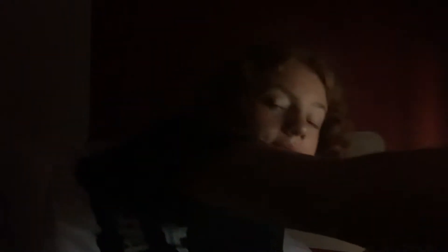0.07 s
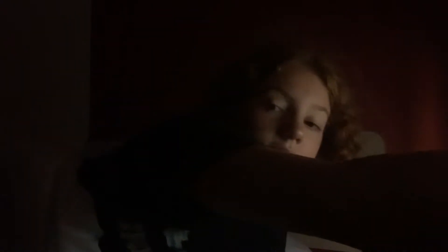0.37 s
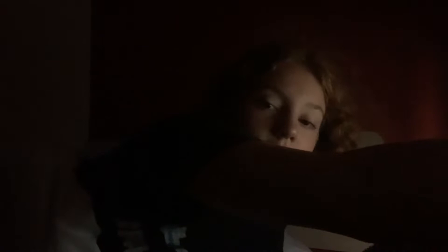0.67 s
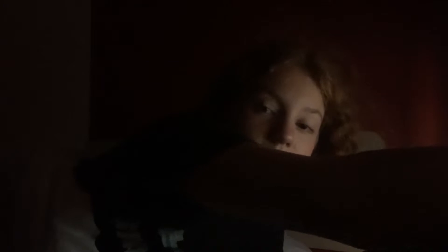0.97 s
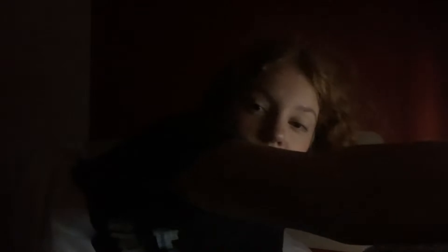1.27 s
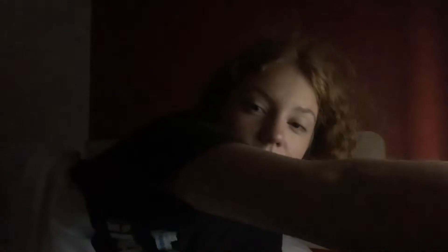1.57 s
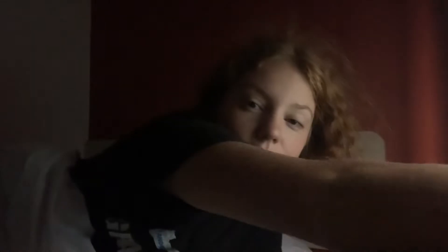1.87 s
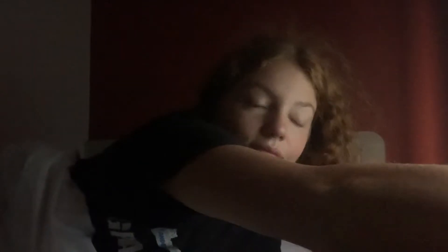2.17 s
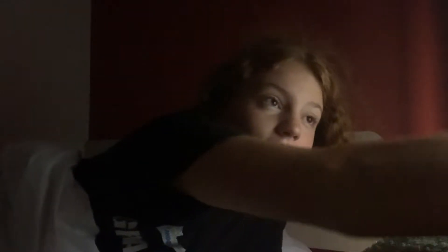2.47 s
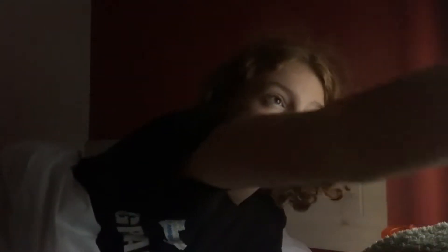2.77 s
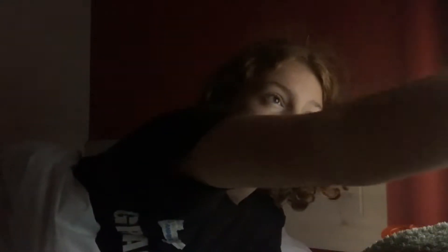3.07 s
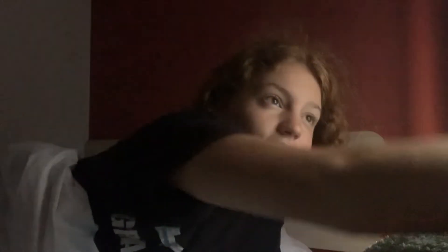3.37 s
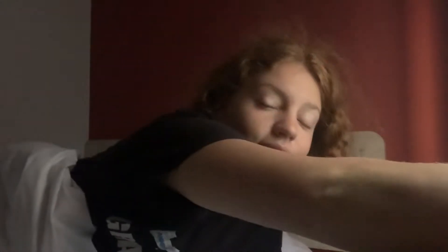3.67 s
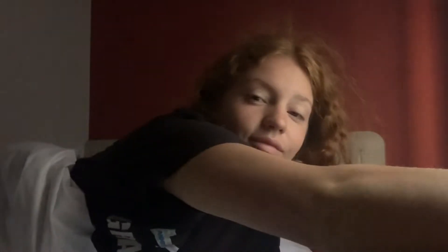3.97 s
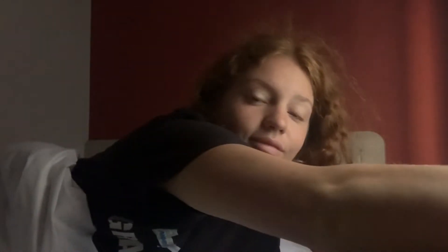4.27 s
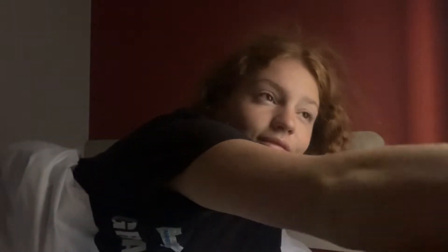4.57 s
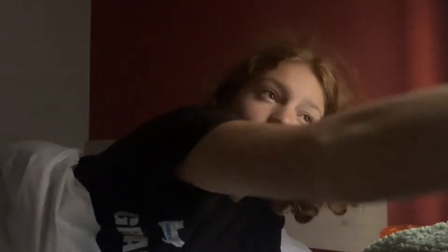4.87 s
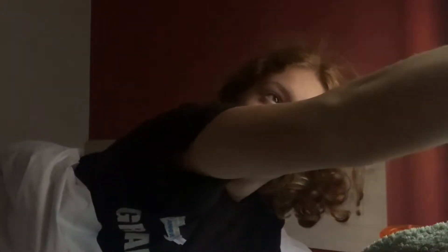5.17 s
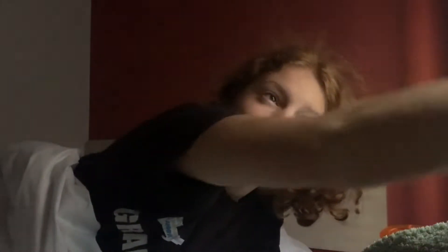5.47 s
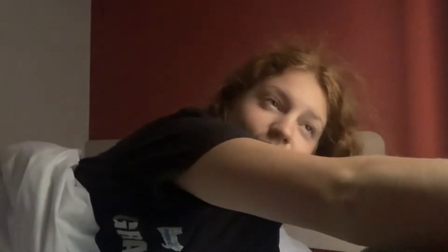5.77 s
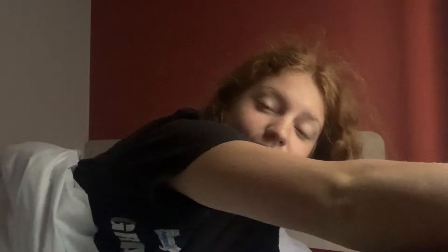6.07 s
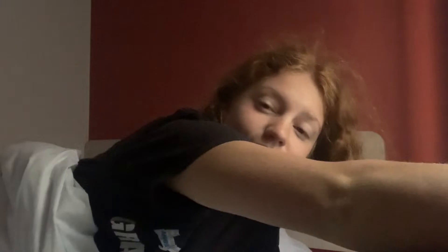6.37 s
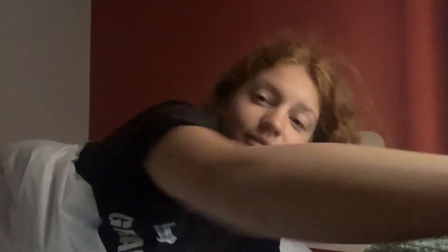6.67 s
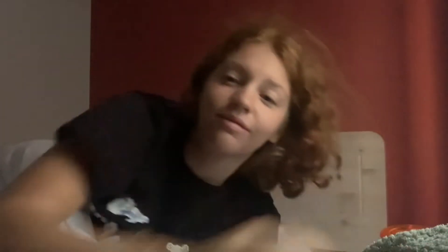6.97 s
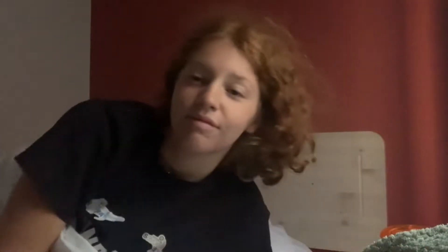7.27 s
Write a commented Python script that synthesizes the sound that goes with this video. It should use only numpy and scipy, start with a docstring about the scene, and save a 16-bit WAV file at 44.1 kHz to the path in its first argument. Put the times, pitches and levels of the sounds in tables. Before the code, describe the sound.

A roller shutter is hauled up in three pulls, its strap hissing and slats clattering, with bedding rustling in a quiet room.

```python
"""A roller shutter is hauled up by its strap, heard from a bed in a small room.
Over low room noise, bedding stirs, slats knock as they take up slack and the winder ticks.
Three pulls follow, at 1.2, 3.1 and 5.4 s: the strap hisses and clatters through its guide,
slats scrape up their rails and the roller rumbles in its box. Bedding rustles between pulls.
At 7.2 s an arm drops on the mattress."""
import sys
import numpy as np
from scipy import signal
from scipy.fft import rfft, irfft
from scipy.io import wavfile
from scipy.ndimage import uniform_filter1d

SR = 44100
rng = np.random.default_rng(int(sys.argv[2]) if len(sys.argv) > 2 else 0)


def waveform_to_disk(signal):
    """Save audio, clipped to [-1, 1], as 16-bit WAV at the path in sys.argv[1]."""
    frames = np.transpose(np.atleast_2d(signal))
    scaled = np.clip(frames, -1, 1) * 32767
    samples = np.round(scaled).astype(np.int16)
    wavfile.write(sys.argv[1], SR, samples)


N = 331632
TIME_S = np.arange(N) / SR
SHUTTER_LAG_MS = .34  # left channel behind right


def undb(db):
    """Decibels to gain."""
    return np.exp(np.asarray(db) * (np.log(10) / 20))


def unit(x):
    """Scale to rms 1."""
    return x / np.sqrt(np.mean(x ** 2))


def along(points, n):
    """Read (Hz, value) points at the bins of an n-point spectrum."""
    hz, value = np.transpose(points)
    return np.interp(np.log(np.arange(n // 2 + 1) * SR / n + 1), np.log(hz), value)


def colour(x, points):
    """Minimum-phase filter through (Hz, dB) points."""
    n = x.shape[-1]
    cepstrum = irfft(np.log(undb(along(points, n))), n)
    cepstrum[1:n // 2] *= 2
    cepstrum[n // 2 + 1:] = 0
    return irfft(rfft(x) * np.exp(rfft(cepstrum)), n)


def resonate(x, hz, width_hz):
    """One resonance, gain 1 at centre."""
    return signal.lfilter(*signal.iirpeak(hz, hz / width_hz, SR), x)


def walk(rate_hz):
    """Slewed random steps, spread near 1."""
    hold = max(2, int(SR / rate_hz))
    steps = np.repeat(rng.standard_normal(N // hold + 1), hold)
    return 1.2 * uniform_filter1d(steps, hold)[:N]


def grains(spread_db, n=N, hold=4, cap_db=14):
    """Dense tiny slips of uneven size, hold samples each; rms 1."""
    size_db = np.minimum(spread_db * rng.exponential(size=n // hold + 1), cap_db)
    return unit(rng.standard_normal(n) * np.repeat(undb(size_db), hold)[:n])


def ramp(start_s, rise_s, hold_s, fall_s):
    """Speed of one movement: up to 1, steady, back to rest."""
    return np.interp(TIME_S, start_s + np.cumsum([0, rise_s, hold_s, fall_s]), [0, 1, 1, 0])


def movements(rows):
    """Gain of light movements: quick swell, long fade."""
    return sum(undb(db) * ramp(s, .14 * span_s, .01 * span_s, .85 * span_s) for s, span_s, db in rows)


def blows(rows, spectrum, spread_db, rise_s, ring_db, q):
    """Each blow is a dying chatter of contacts ringing at its own pitch."""
    t = np.arange(SR // 5) / SR
    force = np.zeros(N + len(t))
    for s, db, chatter_s, hz in rows:
        envelope = (1 - np.exp(-t / rise_s)) * np.exp(-t / max(chatter_s, 1e-4))
        burst = unit(colour(grains(spread_db, len(t)) * envelope, spectrum))
        burst = burst + undb(ring_db) * unit(resonate(burst, hz, hz / q))
        start = int(s * SR)
        force[start:start + len(t)] += undb(db) * unit(burst) / np.sqrt(6)
    return force[:N]


# stereo width: (frequency [Hz], side minus mid [dB])
DIFFUSE_WIDTH = [(50, -6), (130, -9), (270, -7.5), (550, 0), (1100, 1), (5500, -0.5), (8000, 6),
                 (10000, 3.5), (14000, -63)]


def diffuse(n):
    """Noise from all sides, alike left and right in the bass."""
    mid, side = rng.standard_normal((2, n))
    side = colour(side, DIFFUSE_WIDTH)
    return np.array([mid + side, mid - side])


# reverberation: (frequency [Hz], t60 [s])
ROOM_DECAY = [(80, 0.96), (300, 0.3), (1000, 0.29), (3000, 0.37), (7000, 0.28), (13000, 0.32),
              (14800, 0.098)]
# neutral spectrum: (frequency [Hz], level [dB])
FLAT = [(20, 0), (20000, 0)]


def response(spectrum, direct_db, lag_ms, modes=(), early_db=-2, early_s=0.026):
    """Unit-energy impulse response of object and room; positive lag is to the right."""
    n = SR * 3 // 5
    t = np.arange(n) / SR
    noise, tail = rfft(diffuse(n)), 0
    for centre_hz, t60_s in ROOM_DECAY:
        band = along([(hz, float(hz == centre_hz)) for hz, _ in ROOM_DECAY], n)
        tail = tail + irfft(noise * band, n) * undb(-60 * t / t60_s)
    near_walls = 1 + undb(early_db) * np.exp(-(t / early_s) ** 2)
    paths = unit(tail * near_walls) / np.sqrt(n)
    lag = int(round(lag_ms * SR / 1000))
    paths[0, max(lag, 0)] += undb(direct_db)
    paths[1, max(-lag, 0)] += undb(direct_db)
    body = colour(paths, spectrum)
    body = body + sum(undb(db) * resonate(body, hz, width_hz) for hz, width_hz, db in modes)
    return body / np.sqrt(np.sum(body.mean(axis=0) ** 2))


def heard(force, impulse):
    """Play a force through object and room."""
    return signal.oaconvolve(force[None], impulse, axes=1)[:, :N]


# strap pulls: (time [s], rise [s], hold [s], fall [s], peak rib rate [Hz],
# hiss [dB], scrape [dB], rumble [dB])
PULLS = [(1.234, 0.11, 0.5, 0.0758, 56, -56, -60, -49), (3.088, 0.21, 0.18, 0.28, 69, -43.5, -49.5, -43),
         (5.375, 0.23, 0.15, 0.14, 104, -38.5, -44, -41.5)]


def hauling(layer, power):
    """Gain of a layer as a power of strap speed."""
    column = ("hiss", "scrape", "rumble").index(layer)
    return sum(undb(levels_db[column]) * ramp(s, rise_s, hold_s, fall_s) ** power
               for s, rise_s, hold_s, fall_s, _, *levels_db in PULLS)


# slats binding in the rails: (time [s], length [s], scrape [dB], rumble [dB])
BINDS = [(1.415, 0.068, -44.5, -46), (1.773, 0.061, -47.5, -40.5), (3.197, .1, -50.5, -47),
         (3.286, 0.071, -49, -43), (3.414, 0.098, -47.5, -42), (3.54, 0.23, -62, -78),
         (5.542, 0.08, -41, -39), (5.637, 0.089, -42.5, -40.5)]


def binding(layer):
    """Gain of a layer, swelling and easing where the slats bind."""
    column = ("scrape", "rumble").index(layer)
    return sum(undb(levels_db[column]) * ramp(s, span_s / 2, 0, span_s / 2)
               for s, span_s, *levels_db in BINDS)


# room noise: (frequency [Hz], level [dB])
AIR_SPECTRUM = [(12, -47), (20, -1), (54, -4.5), (245, -8.5), (333, -17.5), (452, -26.5), (788, -32),
                (1040, -26), (1580, -35.5), (2330, -38.5), (2610, -40), (5090, -42), (7520, -48),
                (13500, -41), (14400, -69), (15200, -82)]
# hum tones: (frequency [Hz], level [dB])
HUM_TONES = [(67, -63), (313, -75.5)]


def air(noise_db=-62, split_hz=300, swell_db=3.2, waver_db=4):
    """Room noise: steady treble, uneven bass, faint wavering hum."""
    noise = colour(diffuse(N), AIR_SPECTRUM)
    noise = noise / np.std(noise.mean(axis=0)) * undb(noise_db)
    bass = signal.sosfiltfilt(signal.butter(2, split_hz, fs=SR, output="sos"), noise)
    hum = sum(undb(db + waver_db * walk(21)) * np.sin(2 * np.pi * hz * TIME_S + 3.45 * walk(11))
              for hz, db in HUM_TONES)
    return noise - bass + bass * undb(swell_db * walk(24)) + np.sqrt(2) * hum


# cloth friction: (frequency [Hz], level [dB])
CLOTH_SPECTRUM = [(240, -12), (400, 1.5), (518, -4.5), (1190, -5.5), (2700, -10), (5110, -11), (7700, -17),
                  (11100, -12), (13900, -28), (15000, -106)]
# bedding and sleeve shifts: (time [s], length [s], level [dB], pitch [Hz])
RUSTLES = [(0, 0.32, -61, 630), (2.256, 0.29, -64.5, 4480), (3.759, 0.018, -55, 534),
           (3.844, 0.078, -61.5, 530), (4.32, 0.27, -78.5, 2550), (4.872, 0.064, -63.5, 3080),
           (5.906, 0.16, -62, 1984), (6.094, 0.17, -66.5, 2210), (6.972, 0.14, -67.5, 4700),
           (7.047, 0.3, -64, 1320), (7.198, 0.47, -64.5, 2640)]


def sheets(uneven_db=3.5, q=1.76):
    """Cloth rubs on cloth, each brush at its own pitch."""
    fibres = unit(colour(grains(9.5, hold=8), CLOTH_SPECTRUM))
    rubs = sum(movements([(s, span_s, db)]) * unit(fibres + unit(resonate(fibres, hz, hz / q)))
               for s, span_s, db, hz in RUSTLES)
    return heard(rubs * undb(uneven_db * walk(30)), response(FLAT, -0.43, -.04))


# roller box: (frequency [Hz], level [dB])
BOX_SPECTRUM = [(40, -18.5), (65, -5), (100, 1), (150, -1), (215, -3.5), (265, -2), (315, -1), (385, -5.5),
                (450, -13.5), (600, -20.5), (800, -48.5), (1300, -79.5)]
# shutter resonances: (frequency [Hz], width [Hz], gain [dB])
SHUTTER_MODES = [(223, 12, 0.5), (319.2, 10, -4), (383.4, 11, 4), (670, 180, -2.5), (910, 12, -16),
                 (1110, 70, 7), (1400, 58, 25.5), (1770, 72, 20.5), (1960, 66, 16.5), (2054, 17, 22.5),
                 (2820, 370, 5.5), (5600, 92, -18), (6300, 430, -6.5), (11500, 170, 7)]
# hanging slats rocking the roller: (time [s], length [s], level [dB])
SWAYS = [(0, 0.32, -50.5), (.83, 0.073, -48), (1.05, 0.35, -46), (3.62, 0.49, -50)]


def roller(gain_db=-1, lumpy_db=0.6, shift_hz=7):
    """The roller rumbles in its box; resonances shift as it turns."""
    drive = hauling("rumble", 0.85) + undb(-5) * binding("rumble") + movements(SWAYS)
    rumble = drive * grains(3.4) * undb(gain_db + lumpy_db * walk(25.15))
    blend_rad = 1.2 * walk(shift_hz)
    return sum(heard(rumble * share, response(BOX_SPECTRUM, -4.5, SHUTTER_LAG_MS, SHUTTER_MODES))
               for share in (np.cos(blend_rad), np.sin(blend_rad)))


# arm thud: (frequency [Hz], level [dB])
THUD_SPECTRUM = [(45, -9), (80, -6), (125, -1), (200, -10), (300, -7), (450, -32.5), (800, -48)]
# mattress modes: (frequency [Hz], level [dB], t60 [s])
BED_MODES = [(33.2, -13, 0.38), (64.7, -2.5, 0.99), (130.7, 2.5, 0.23), (200, -13, 0.17)]
# arm landings: (time [s], cloth [dB], thud [dB], mattress [dB], swell [s])
ARM_BUMPS = [(0.045, -65.5, -45, -44, 0.32), (6.522, -47, -44.5, -43.5, 0.013),
             (7.192, -40.5, -26.5, -29.5, 0.015)]


def arm_on_bed(settle_s=0.013, damp_s=.15):
    """An arm swishes on cloth, thuds and rings the mattress until its weight damps it."""
    t = np.arange(SR // 4) / SR
    envelope = np.exp(-(t / damp_s) ** 6) * (1 - np.exp(-t / .002))
    mattress = envelope * sum(undb(db - 60 * t / t60_s) * np.sin(2 * np.pi * hz * t)
                              for hz, db, t60_s in BED_MODES)
    cloth, thud, ring = 0, 0, np.zeros(N + len(t))
    for s, cloth_db, thud_db, ring_db, swell_s in ARM_BUMPS:
        after_s, before_s = np.maximum(TIME_S - s, 0), np.maximum(s - TIME_S, 0)
        press = np.exp(-np.minimum(before_s / swell_s + (after_s / settle_s) ** 2, 20))
        cloth = cloth + undb(cloth_db) * press
        thud = thud + undb(thud_db) * press ** 2
        ring[int(s * SR):int(s * SR) + len(t)] += undb(ring_db) * mattress
    swish = heard(cloth * grains(3.3, hold=8), response(CLOTH_SPECTRUM, -4.2, -.04))
    return swish + heard(thud * grains(2.1), response(THUD_SPECTRUM, 1.4, 0)) + ring[:N]


# light slat contact: (frequency [Hz], level [dB])
CLICK_SPECTRUM = [(350, -76), (600, -16.5), (896, 1), (1480, -5), (1700, 0), (2210, -11.5), (2630, -2.5),
                  (2870, -9), (3790, -4), (12000, -16.5), (15600, -92), (22000, -120)]
# settling slats: (time [s], level [dB], chatter [s], pitch [Hz])
CLICKS = [(.283, -64, 0.0005, 4600), (3.805, -59.5, 0.0034, 3120), (4.345, -74.5, 0.0026, 2900),
          (5.096, -61.5, 0.012, 2690), (5.109, -58.5, 0.0035, 2770), (5.173, -64.5, 0.011, 1540),
          (5.254, -56, 0.012, 2580), (2.523, -67.5, 0.0012, 4000), (6.308, -75, .001, 3040),
          (6.062, -70.5, 0.0087, 2100), (6.131, -61, 0.006, 1280), (6.713, -56.5, 0.002, 4850),
          (6.827, -61.5, 0.069, 1100), (7.081, -62.5, 0.0013, 2480)]


def slat_clicks():
    """Single slats click as they settle."""
    force = blows(CLICKS, CLICK_SPECTRUM, spread_db=7.5, rise_s=0.00019, ring_db=0, q=3.5)
    return heard(force, response(FLAT, 0.076, SHUTTER_LAG_MS))


# slat on slat: (frequency [Hz], level [dB])
CLACK_SPECTRUM = [(260, -53), (450, 5.5), (561, -2.5), (812, 0.5), (894, 2.5), (1240, -2), (1410, 6),
                  (1640, -2.5), (2010, 1), (3210, -9), (5870, -14), (7420, -20), (12000, -20.5),
                  (15600, -101), (22000, -120)]
# slat collisions: (time [s], clack [dB], box boom [dB], chatter [s], pitch [Hz])
KNOCKS = [(.285, -72.5, -53.5, 0.0056, 1110), (0.561, -54.5, -54, 0.0028, 1000),
          (0.865, -49, -50, 0.0084, 690), (.922, -54, -45, 0.0037, 1510), (1.042, -45, -43, 0.0059, 1800),
          (1.951, -47, -44, 0.006, 1020), (2.000, -46.5, -38.5, 0.0055, 800),
          (2.015, -51, -45.5, 0.005, 1240), (2.525, -69, -62, 0.011, 1420), (2.88, -53, -55, 0.0021, 1200),
          (2.994, -51.5, -46.5, 0.0023, 1350), (3.011, -47.5, -42, 0.011, 1440),
          (3.692, -54.5, -49.5, 0.0066, 1270), (3.762, -62.5, -56.5, 0.0017, 2350),
          (3.959, -55.5, -49.5, 0.0017, 1290), (3.971, -55, -47.5, 0.012, 1550),
          (4.029, -76, -53, 0.0036, 700), (4.53, -66, -62, 0.0041, 694), (5.289, -53.5, -45, 0.002, 960),
          (5.301, -47, -43.5, 0.0094, 1810), (5.346, -69, -47, 0.0044, 700),
          (5.914, -55.5, -46.5, 0.011, 1780), (6.403, -78, -56, 0.0044, 710),
          (6.508, -56.5, -50.5, 0.0085, 1420)]


def slat_knocks(rub_in_s=.014, rub_out_s=.055, rub_db=-9.5, bind_db=-0.5):
    """Slats knock together, rubbing around each landing and where they bind."""
    rows = [(s, db, chatter_s, hz) for s, db, _, chatter_s, hz in KNOCKS]
    knocks = blows(rows, CLACK_SPECTRUM, spread_db=6.5, rise_s=.001, ring_db=-8, q=4.1)
    landing = sum(undb(db + rub_db) * ramp(s - rub_in_s, rub_in_s, 0, rub_out_s) for s, db, *_ in KNOCKS)
    friction = unit(colour(grains(5.8, hold=24), CLACK_SPECTRUM))
    rubs = (landing + undb(bind_db) * binding("scrape")) * friction
    return heard(knocks + rubs, response(FLAT, -3.1, SHUTTER_LAG_MS))


# hollow box resonances: (frequency [Hz], width [Hz], gain [dB])
BOX_MODES = [(164.3, 3.6, 4.5), (209.3, 7.2, 7), (318.7, 7.9, 0.5), (391, 51, -7)]


def box_booms(gain_db=-2.5, centre_hz=300, stray_octaves=.4, stretch=3.44):
    """The hollow box booms after each knock, at a slightly different pitch."""
    pitches_hz = centre_hz * 2 ** rng.uniform(-stray_octaves, stray_octaves, len(KNOCKS))
    rows = [(s, db + gain_db, stretch * chatter_s, hz)
            for (s, _, db, chatter_s, _), hz in zip(KNOCKS, pitches_hz)]
    force = blows(rows, BOX_SPECTRUM, spread_db=5, rise_s=0.002, ring_db=-9, q=3.9)
    return heard(force, response(FLAT, -1.5, SHUTTER_LAG_MS, BOX_MODES))


# winder tick: (frequency [Hz], level [dB])
TICK_SPECTRUM = [(1290, -14), (2200, -25.5), (2620, -3), (2890, -11), (4170, -3), (4920, 2), (5570, 9.5),
                 (7520, 2.5), (8440, 2), (9560, 4), (12300, 5), (15000, 1), (16000, -29)]
# strap and winder ticks: (time [s], level [dB], chatter [s], pitch [Hz])
TICKS = [(.539, -56, 0.033, 10600), (.550, -66, 0.00065, 9000), (.562, -57, 0.0012, 9800),
         (.873, -53.5, 0.0024, 13800), (.924, -59, 0.0067, 8500), (1.027, -66, 0.0046, 11100),
         (1.045, -53, 0.0062, 11800), (1.276, -59.5, 0.01, 11500), (1.361, -54, 0.0011, 6300),
         (1.441, -44.5, 0.04, 11200), (1.608, -60, 0.011, 9900), (1.678, -67, 0.005, 11500),
         (1.722, -64, 0.0047, 9000), (1.76, -66, 0.0051, 12000), (1.787, -54, 0.0087, 10960),
         (1.828, -39.5, 0.0067, 13100), (1.838, -47, 0.028, 5800), (2.284, -59, 0.00012, 4340),
         (2.334, -59, 0.001, 4470), (2.5225, -46.5, 0.00043, 9640), (2.526, -54.5, 0.0012, 6800),
         (2.858, -49, 0.0033, 9900), (2.866, -52.5, 0.025, 5650), (2.869, -45.5, 0.0071, 10500),
         (3.444, -46.5, 0.007, 11100), (3.879, -65, 0.001, 7800), (4.438, -67.5, 0.0024, 11200),
         (4.523, -79, .001, 10000), (4.583, -74, .003, 12000), (4.672, -72, 0.00091, 10800),
         (4.682, -75, 0.0014, 12000), (4.750, -69.5, 0.00079, 11500), (4.922, -65, 0.0019, 10200),
         (4.936, -63.5, 0.0032, 12000), (5.2415, -49, 0.00048, 11000), (5.243, -39.5, 0.0012, 11200),
         (5.246, -45, 0.046, 5900), (6.164, -79, .0006, 12400), (6.308, -71, 0.0024, 12800),
         (6.7135, -53.5, 0.00093, 11500), (6.720, -55, 0.0031, 11000), (6.727, -52.5, 0.0024, 7400),
         (6.824, -56, 0.004, 11500), (6.837, -56, 0.011, 11500)]


def winder():
    """Strap and winder snap tight with short bright ticks."""
    force = blows(TICKS, TICK_SPECTRUM, spread_db=1.5, rise_s=0.0009, ring_db=-9, q=5)
    return heard(force, response(FLAT, 0.14, -.09))


# strap friction: (frequency [Hz], level [dB])
STRAP_SPECTRUM = [(1650, -31), (2800, -15), (3470, 1), (3840, -1.5), (4690, 7.5), (5150, 4.5), (6330, 8.5),
                  (7410, 1.5), (8310, 5.5), (9260, 4.5), (11100, 7), (11600, 3), (13800, 2), (15200, -56),
                  (15500, -102)]
# slack strap sliding through the hand: (time [s], length [s], level [dB])
SLIDES = [(.82, 0.15, -60.5), (.87, 0.065, -49.5), (2.39, 0.22, -67.5), (2.92, 0.14, -57), (3.65, 0.1, -55),
          (4.45, 0.2, -70.5), (5.228, 0.027, -59), (5.88, 0.24, -79), (6.42, 0.09, -77)]


def strap(pull_db=-5.5, flutter_db=1.8, surge_db=1.3, bite_db=-3, bite_hz=11800):
    """The woven strap hisses and clatters through its guide, brighter on harder pulls."""
    pull = undb(pull_db) * hauling("hiss", 1.73)
    effort = pull / pull.max()
    friction = undb(flutter_db * walk(90) + surge_db * walk(22.02))
    rasp = grains(3.1, hold=8)
    rasp = rasp + undb(bite_db) * effort * resonate(rasp, bite_hz, bite_hz / 4)
    hiss = (pull + movements(SLIDES)) * friction * rasp
    clatter = pull * friction * ribs()
    return (heard(hiss, response(STRAP_SPECTRUM, -19, SHUTTER_LAG_MS, SHUTTER_MODES))
            + heard(clatter, response(STRAP_SPECTRUM, -1.5, .09)))


# guide and winder resonances: (frequency [Hz], width [Hz], level [dB])
GUIDE_MODES = [(6120, 1100, -0.5), (11060, 5900, 1)]


def ribs(decay_cycles=.28, spread_db=4.2, jitter=.1):
    """Strap ribs catch on the guide, faster with speed; each rings it differently."""
    rate_hz = sum(peak_hz * ramp(s, rise_s, hold_s, fall_s) ** .25
                  for s, rise_s, hold_s, fall_s, peak_hz, *_ in PULLS)
    cycles = np.cumsum(np.maximum(rate_hz * (1 + jitter * walk(60)), 0)) / SR
    rib = cycles.astype(int)
    catch = np.exp(-(cycles % 1) / decay_cycles)
    sizes = undb(spread_db * np.sqrt(3) * rng.uniform(-1, 1, (N // 100, len(GUIDE_MODES))))
    clatter = sum(undb(db) * unit(resonate(rng.standard_normal(N), hz, width_hz)) * catch * sizes[rib, k]
                  for k, (hz, width_hz, db) in enumerate(GUIDE_MODES))
    return clatter / np.sqrt(np.mean(clatter[rate_hz > 0] ** 2))


# slat on rail: (frequency [Hz], level [dB])
SCRAPE_SPECTRUM = [(330, -20), (480, 1.5), (850, 11), (1350, 0.5), (2000, -2.5), (2900, 0), (3600, -19),
                   (5000, -27)]


def slat_scrape(gain_db=-2, judder_db=6):
    """Slats scrape and judder up their rails."""
    scrape = hauling("scrape", 1.38) * grains(4.2, hold=24) * undb(gain_db + judder_db * walk(45))
    return heard(scrape, response(SCRAPE_SPECTRUM, -1.8, SHUTTER_LAG_MS, SHUTTER_MODES))


def slat_rattle(gain_db=-7, rate_hz=420, spread_db=2.2, sway_db=1.5):
    """Loose slats tap in a dense, uneven roll, harder as the strap runs faster."""
    gaps = rng.uniform(.2, 1.8, int(2 * rate_hz * N / SR)) * SR / rate_hz
    onsets = np.cumsum(gaps).astype(int)
    onsets = onsets[onsets < N]
    sizes = undb(spread_db * rng.standard_normal(len(onsets))) * rng.choice([-1, 1], len(onsets))
    taps = unit(np.bincount(onsets, sizes, N))
    force = taps * hauling("scrape", 1.38) * undb(gain_db - sway_db * walk(35))
    return heard(force, response(CLICK_SPECTRUM, -4, SHUTTER_LAG_MS))


# dry clicks: (time [s], level [dB], chatter [s], pitch [Hz])
SNAPS = [(4.159, -57, 0.00018, 2370), (4.877, -61, 0.0033, 3070), (4.885, -67, 0.0063, 3870),
         (6.110, -66.5, 0.00078, 2400)]


def snaps():
    """Small clicks near the bed, with little room in them."""
    force = blows(SNAPS, CLICK_SPECTRUM, spread_db=17, rise_s=0.0001, ring_db=7, q=2.4)
    return heard(force, response(FLAT, 4.4, .1))


def pan(left_minus_right_db):
    """Channel gains."""
    return undb(np.array([[left_minus_right_db], [-left_minus_right_db]]) / 2)


def scene():
    """Stereo mix; the window is right of the bed."""
    bedroom = air() + sheets() + arm_on_bed() + snaps()
    box = roller() + box_booms()
    slats = slat_clicks() + slat_knocks() + slat_scrape() + slat_rattle()
    return bedroom + pan(-0.2) * box + pan(-3) * slats + pan(-0.5) * (winder() + strap())


def record(dry):
    """Steep low-pass at 15.8 kHz."""
    return signal.sosfilt(signal.ellip(8, .2, 70, 15800, fs=SR, output="sos"), dry)


dry = scene()
out = record(dry)
waveform_to_disk(out)
```